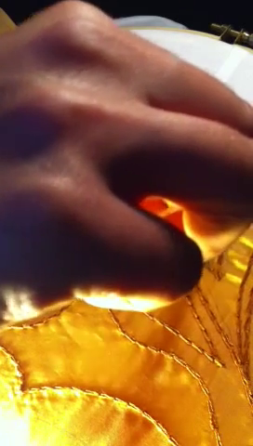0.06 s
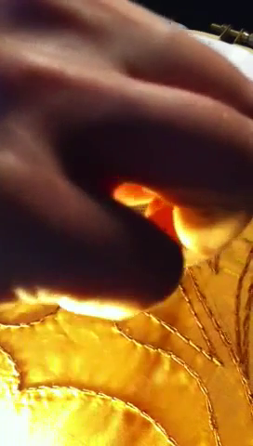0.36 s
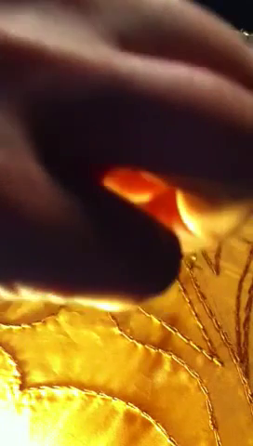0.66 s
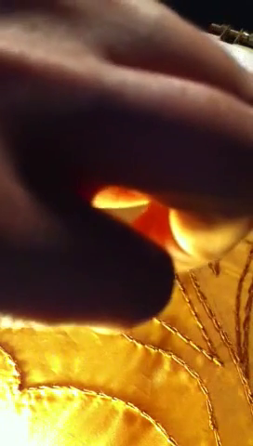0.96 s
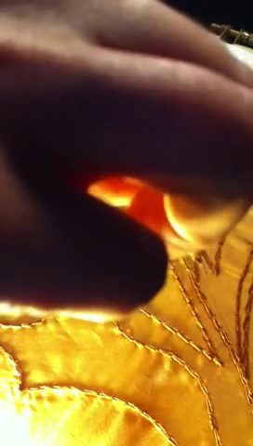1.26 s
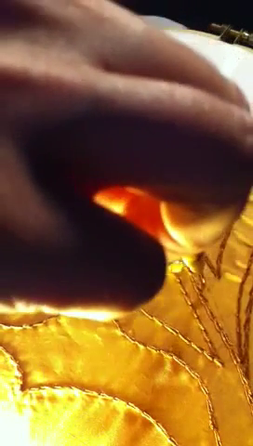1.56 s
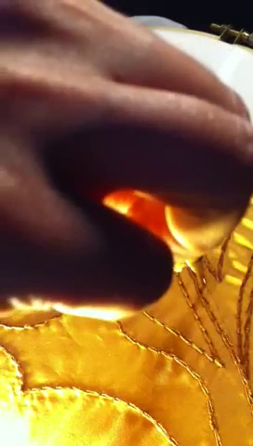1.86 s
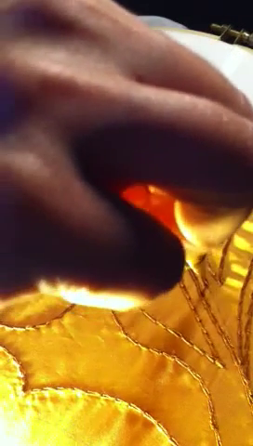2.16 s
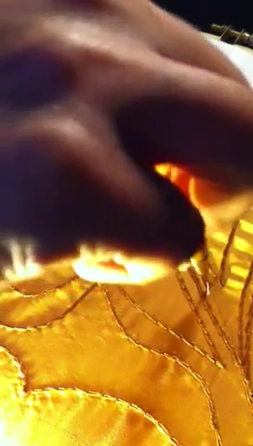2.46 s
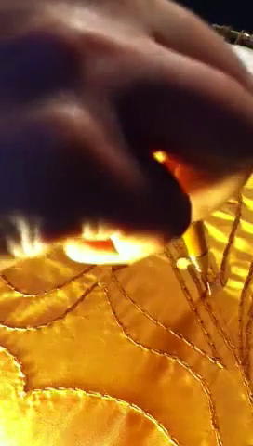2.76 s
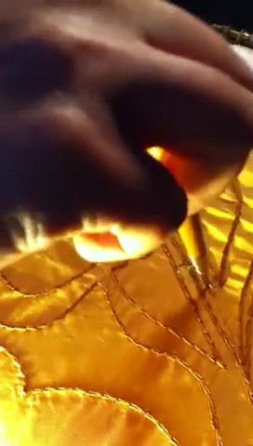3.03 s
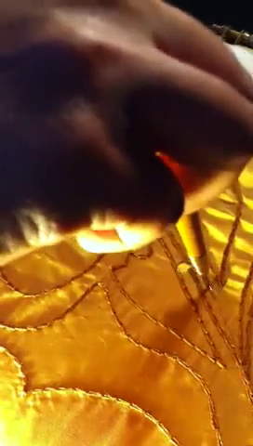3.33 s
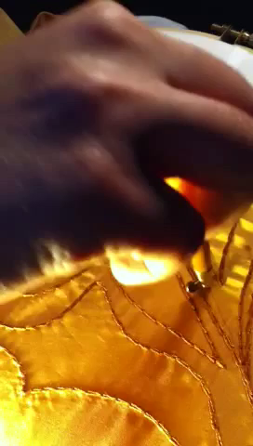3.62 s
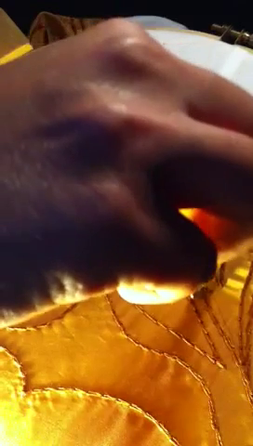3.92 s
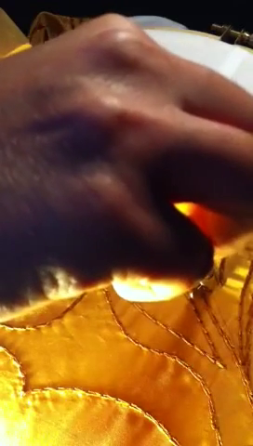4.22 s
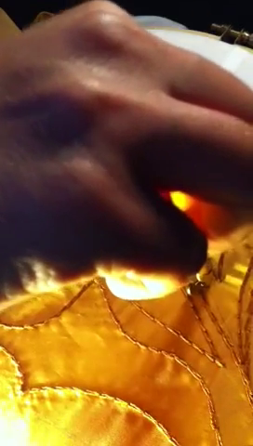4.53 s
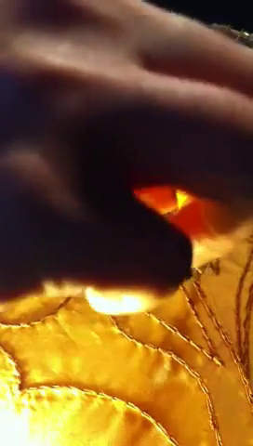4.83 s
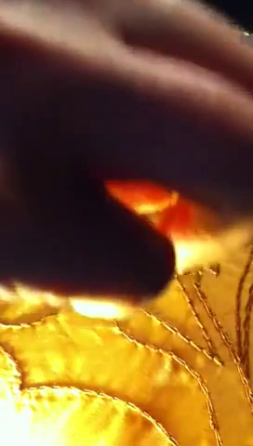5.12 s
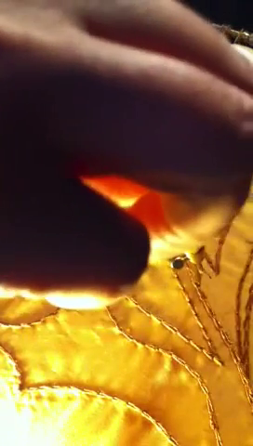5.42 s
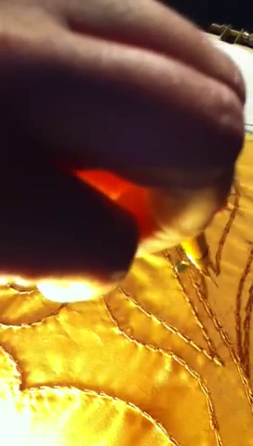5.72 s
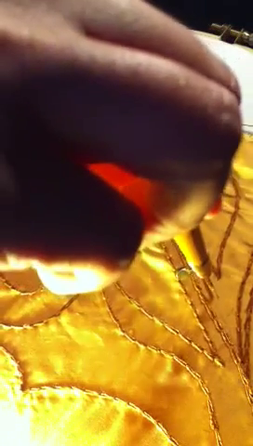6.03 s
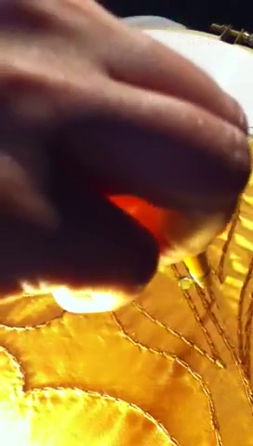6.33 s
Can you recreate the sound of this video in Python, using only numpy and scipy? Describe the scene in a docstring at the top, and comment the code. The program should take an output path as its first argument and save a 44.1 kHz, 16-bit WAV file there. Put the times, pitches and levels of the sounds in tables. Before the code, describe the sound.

A steady low appliance hum and soft hiss fill a small room throughout. Close by, a tambour hook works through fabric stretched tight in a hoop, making short, dry, drum-like tocks with a tiny fibre crackle and slight room echo. A quick cluster of tocks comes at about 0.7 seconds. Thread rasps softly through the weave at 1.2 and 1.5 seconds, followed by a faint tick at 2 and a light rustle at 2.7. The loudest, sharpest click snaps at 2.9 seconds, then three quick, duller tocks land around 3.5. From 3.7 to 4.5 seconds the thread faintly creaks and squeaks as a loop is tugged tight. Another tock sounds at 4.8 seconds and a quick run of three around 5.2, the last strongest. A brief thread rasp follows near 5.9 seconds, leaving only the hum.

```python
"""An appliance hums steadily in a small, softly hissing room, and thread rasps through fabric close by.
A tambour (embroidery) hook is worked through the fabric, which is stretched drum-tight in a hoop.
Each time the hook pops through or snaps free, the cloth gives a short dull tock and its fibres crackle.
Past the middle, a loop is tugged tight and the thread creaks and faintly squeaks."""
import sys
import numpy as np
from scipy import signal
from scipy.fft import rfft, irfft
from scipy.io import wavfile

SR = 44100
rng = np.random.default_rng(int(sys.argv[2]) if len(sys.argv) > 2 else 0)


def wav_out(sig):
    """Save sig, one row per channel (or a flat mono array), as 16-bit PCM at SR to the path in sys.argv[1]."""
    wavfile.write(sys.argv[1], SR, np.round(np.clip(np.atleast_2d(sig).T, -1, 1) * 32767).astype(np.int16))


N = 285808
TIME = np.arange(N) / SR

# The hook pops through or lets go of the cloth:
# start_s, strength_db, release_ms, cloth_thud_db, hook_ring_db, crackle_db
PUNCHES = [(0.669, 6.5, 0.077, 12.5, 1, -66), (0.7329, -2, 0.064, 2, -3, -72),
           (0.74035, 4.5, 0.058, -2, 7, -66), (0.7420, 6, 0.052, -2, 9, -63),
           (0.8001, 0, 0.097, 13, 2, -47), (2.0190, -9, 0.067, 0, 1, -66),
           (2.9364, 23.5, 0.028, -4, -0.5, -48.5), (3.489, 9.5, 0.92, 7, 0, -59),
           (3.5200, 14.5, 0.24, -4, -11, -61), (3.5392, 4, 0.038, 21.5, 1, -53),
           (4.8137, 9, 0.21, 0.5, -2, -66), (4.821, -10, 0.014, -4, 4.5, -61),
           (5.1592, 2, 0.12, -13, 2.5, -72), (5.1825, 3, 0.25, 11, 8, -67),
           (5.2404, 12.5, 0.12, 0, 4.5, -54)]


def from_db(db):
    """Turn decibels into a number to multiply a sound by."""
    return 10 ** (np.asarray(db) / 20)


def rms_one(x):
    """Scale a signal so that its average size (rms) is 1."""
    return x / np.sqrt(np.mean(x ** 2) + 1e-20)


def at_hz(points, hz):
    """Read between the rows of a (pitch_hz, value) table, with octaves evenly spaced."""
    known_hz, values = np.transpose(points)
    return np.interp(np.log(hz + 1e-3), np.log(known_hz), values)


def noise(colour):
    """Noise of rms 1, shaped by a (pitch_hz, level_db) table."""
    gain = from_db(at_hz(colour, np.fft.rfftfreq(N, 1 / SR)))
    return rms_one(irfft(rfft(rng.standard_normal(N)) * gain, N))


def narrow_noise(hz, width_hz):
    """Noise of rms 1 gathered around one pitch; around 0 Hz it is a random drift."""
    detune = (np.fft.rfftfreq(N, 1 / SR) - hz) / width_hz
    return rms_one(irfft(rfft(rng.standard_normal(N)) / (1 + 2 * detune ** 2), N))


def resonate(x, hz, width_hz):
    """Let a push ring at one pitch; a greater width dies away sooner."""
    decay, step = np.exp(-np.pi * width_hz / SR), 2 * np.pi * hz / SR
    feedback = [1, -2 * decay * np.cos(step), decay ** 2]
    return signal.lfilter([0, (1 - decay ** 2) * np.sin(step)], feedback, x + 1e-18)


def swell(peak_s, half_length_s):
    """A smooth rise and fall around a moment."""
    return np.exp(-.5 * ((TIME - peak_s) / half_length_s) ** 2)


def add(track, start_s, sound):
    """Mix a sound into a track at a given time."""
    start = round(start_s * SR)
    track[start:start + len(sound)] += sound[:N - start]


def appliance_hum(motor_hz=281.5, wander_hz=.3, waver_db=-1.17, whine_hz=15000, whine_db=-88):
    """A motor hums at a nearly even speed, with drones around it and a thin electronic whine."""
    # The motor's tone and overtones: pitch_multiple, level_db
    tones = [(1, -52.5), (2, -65.5), (4, -72)]
    # Resonances droning along with it: pitch_hz, width_hz, level_db
    resonances = [(116.7, 9.6, -72.5), (225.6, 5, -65), (556, 4.1, -75.5), (1463, 22, -79.5)]
    speed_hz = motor_hz + wander_hz * narrow_noise(0, 1)
    wobble = 0.066 * narrow_noise(0, 6.1)
    angle = 2 * np.pi * np.cumsum(speed_hz) / SR + wobble
    hum = sum(from_db(db + waver_db * narrow_noise(0, 5.1)) * np.sin(k * angle) for k, db in tones)
    whine = from_db(whine_db) * np.sin(2 * np.pi * whine_hz * TIME)
    drones = sum(from_db(db) * narrow_noise(hz, width) for hz, width, db in resonances)
    return np.sqrt(2) * (hum + whine) + drones


def room_air(level_db=-59):
    """The air of the room makes a soft, low, even rush."""
    # The colour of that rush: pitch_hz, level_db
    air_colour = [(25, -16.5), (62, -24), (95, -17), (125, -3), (230, 4.5), (350, -1), (600, -0.5),
                  (760, -5.5), (1100, -5.5), (1800, -11.5), (4000, -15), (8800, -18.5), (10500, -21.5),
                  (13000, -19.5)]
    return from_db(level_db) * noise(air_colour)


def thread_pulls(catch_db=2.5, catch_hz=130, usual_half_s=0.018, usual_rasp_db=-5.5):
    """Thread catches and slips in the weave: the cloth rustles, and quicker pulls rasp more."""
    # Each pull through the weave: peak_s, half_length_s, level_db
    pulls = [(0.066, 0.0093, -62), (1.226, 0.051, -54), (1.45, 0.023, -55), (2.057, .014, -64),
             (2.687, 0.078, -61), (3.21, 0.017, -58), (4.326, 0.029, -59.5), (5.853, 0.024, -49.5)]
    # The colour of the thread's bright rasp: pitch_hz, level_db
    rasp_colour = [(300, -15), (1000, -1.5), (1800, 6.5), (2600, -1), (3500, 7), (4300, -1.5), (5400, 5),
                   (6600, 2), (8000, -10), (9500, -3), (11000, -22), (17000, -10)]
    # The colour of the cloth's soft rustle: pitch_hz, level_db
    rustle_colour = [(80, -60), (180, 4), (400, 5), (560, 4.5), (900, -3), (1500, -4.5), (2500, -14),
                     (5000, -56)]
    rasp = noise(rasp_colour) * rms_one(from_db(catch_db * narrow_noise(0, catch_hz)))
    rustle, out = noise(rustle_colour), 0
    for peak_s, half_s, db in pulls:
        rasp_db = usual_rasp_db + 3 * np.log2(usual_half_s / half_s)  # half as long: 3 dB more
        out += from_db(db) * swell(peak_s, half_s) * (rustle + from_db(rasp_db) * rasp)
    return out


def cloth_tocks(thud_below_hz=410, ring_hz=2100, ring_octaves=0.3, low_cut_hz=148):
    """The tight cloth is let go and sounds like a drum; a faster release gives a brighter tock."""
    # The quickly fading tones of cloth, hook and hoop: pitch_hz, width_hz, level_db
    tones = [(179, 71, -11.5), (313, 520, -14), (524, 233, -5.5), (652, 120, -6), (846, 68, -9.5),
             (1205, 170, -13), (1480, 177, -9), (1880, 450, -9), (2274, 250, -10.5), (2810, 183, -8),
             (3560, 96, -20.5), (4280, 430, -22.5), (6250, 890, -22), (7400, 310, -23), (12000, 13000, -29)]
    out, t = np.zeros(N), TIME[:SR // 10]
    for start_s, strength_db, release_ms, thud_db, ring_db, _ in PUNCHES:
        push = (t + 1 / SR) * np.exp(-t * 1000 / release_ms)
        push /= push.sum()
        for hz, width, db in tones:
            # A stitch that moves the whole cloth drives the lowest tones most.
            lowness = 1 / (1 + (hz / thud_below_hz) ** 4)
            # A hook that snaps free rings around its own pitch.
            nearness = np.exp(-.5 * (np.log2(hz / ring_hz) / ring_octaves) ** 2)
            gain = from_db(strength_db + db + thud_db * lowness + ring_db * nearness)
            add(out, start_s, gain * resonate(push, hz, width))
    # The deep bass is cut away, so the tocks sound light and dry.
    return signal.sosfilt(signal.butter(5, low_cut_hz, "high", fs=SR, output="sos"), out)


def fibre_crackle(grain_db=6.0, usual_drag_ms=3.25, doubling_db=15.5):
    """The hook's shaft drags past the fibres in a brief crackle, longer after a hard punch."""
    # The colour of the crackle: pitch_hz, level_db
    crackle_colour = [(500, 5), (2000, 6), (4000, 2), (7000, 4.5), (10000, 4), (17000, -29)]
    drag = np.zeros(N)
    for start_s, strength_db, *_, crackle_db in PUNCHES:
        peak_ms = usual_drag_ms * 2 ** (strength_db / doubling_db)
        age = TIME[:SR // 10] * 1000 / peak_ms
        add(drag, start_s, from_db(crackle_db) * age * np.exp(1 - age))
    return drag * noise(crackle_colour) * rms_one(from_db(grain_db * narrow_noise(0, 900)))


def room_echo(sound, delay_s=0.0045, near_db=8.5, near_fade_s=0.059):
    """Nearby surfaces answer in a quick cluster, then each band of pitches fades at its own rate."""
    # The echo's strength next to the direct sound: pitch_hz, level_db
    echo_colour = [(50, 11), (140, -20.5), (300, -5.5), (550, -7), (850, -10.5), (1500, -10.5),
                   (3000, -18.5), (4500, -3.5), (9000, -28), (16000, -10)]
    # The time the echo takes to fall by 60 dB: pitch_hz, fade_s
    fade_times = [(50, 0.22), (150, 0.26), (500, 0.22), (2000, 0.62), (5000, 0.52), (14000, 0.31)]
    t = TIME[:SR // 2]
    hiss, response = rng.standard_normal((2, len(t))), 0
    edges_hz = np.geomspace(40, 19000, 15)
    for k, (low, high) in enumerate(zip(edges_hz, edges_hz[1:])):
        hz = np.sqrt(low * high)
        band = signal.sosfilt(signal.butter(2, [low, high], "band", fs=SR, output="sos"), hiss[k % 2])
        near = from_db(near_db - 60 * t / near_fade_s)
        far = from_db(-60 * t / at_hz(fade_times, hz))
        tail = band * (near + far)
        tail *= np.sqrt(2 * (high - low) / SR / np.sum(tail ** 2))  # as strong as the direct sound
        response += from_db(at_hz(echo_colour, hz)) * tail
    out = np.zeros(N)
    add(out, delay_s, signal.fftconvolve(sound, response))
    return out


def thread_tightening(tug_half_s=0.039, squeak_rise_s=.02, squeak_width_hz=160):
    """A loop is drawn tight: the thread squeaks as it slips and creaks at each tug."""
    # Slips of the taut thread: start_s, pitch_hz, level_db
    squeaks = [(3.708, 2440, -63.5), (4.12, 5450, -69.5), (4.485, 5500, -74)]
    # Tugs on the thread: peak_s, level_db
    tugs = [(3.9, -68.5), (4.15, -64), (4.31, -62), (4.45, -65)]
    # The tones the creak rings with: pitch_hz, width_hz, level_db
    creak_tones = [(1460, 220, -4.5), (1940, 240, -3.5), (3040, 540, -7.5)]
    tension = sum(from_db(db) * swell(peak_s, tug_half_s) for peak_s, db in tugs)
    out = tension * sum(from_db(db) * narrow_noise(hz, width) for hz, width, db in creak_tones)
    for start_s, hz, db in squeaks:
        age = np.clip((TIME - start_s) / squeak_rise_s, 0, 20)
        out += from_db(db) * age * np.exp(1 - age) * narrow_noise(hz, squeak_width_hz)
    return out


def scene():
    """Close stitching over the hum and air of the room; only the tocks echo."""
    tocks = cloth_tocks()
    stitching = tocks + room_echo(tocks) + fibre_crackle() + thread_pulls() + thread_tightening()
    return (stitching + appliance_hum() + room_air())[None]


def record(dry):
    """Cut away the very highest treble, above 17200 Hz."""
    return signal.sosfilt(signal.ellip(10, .1, 70, 17200, fs=SR, output="sos"), dry)


dry = scene()
out = record(dry)
wav_out(out)
```